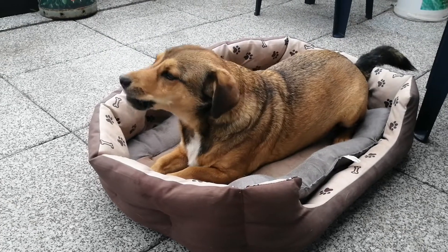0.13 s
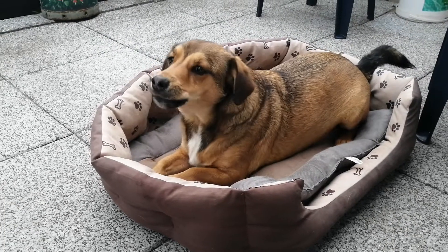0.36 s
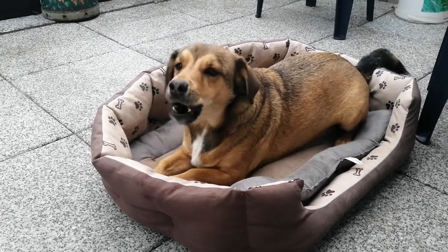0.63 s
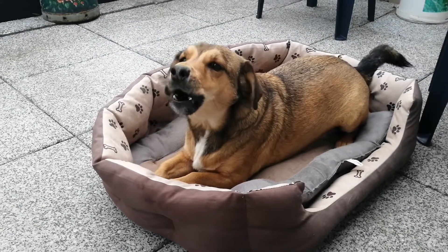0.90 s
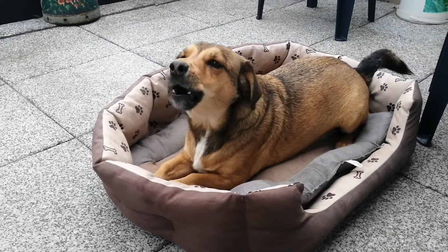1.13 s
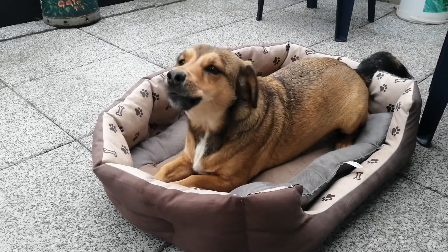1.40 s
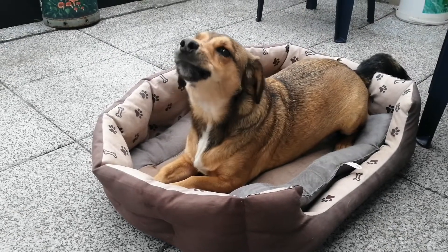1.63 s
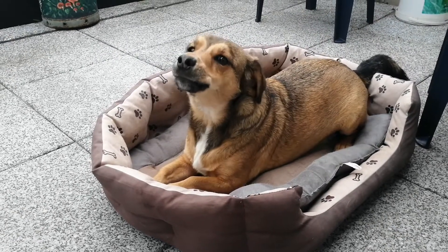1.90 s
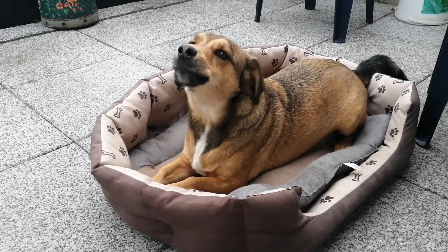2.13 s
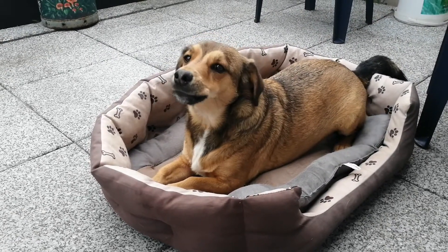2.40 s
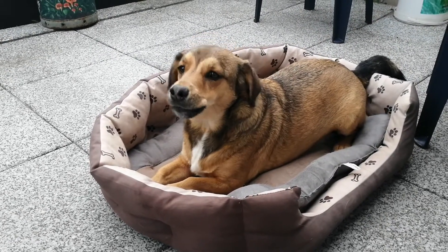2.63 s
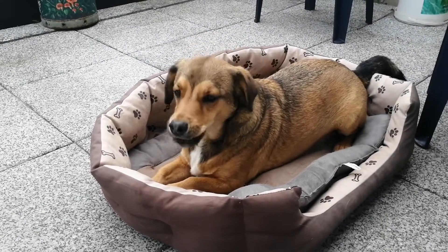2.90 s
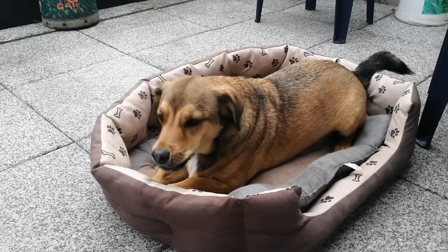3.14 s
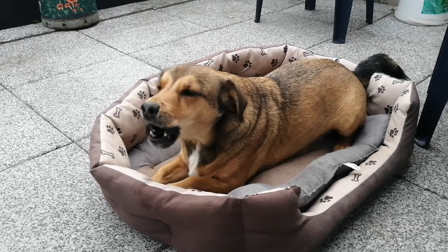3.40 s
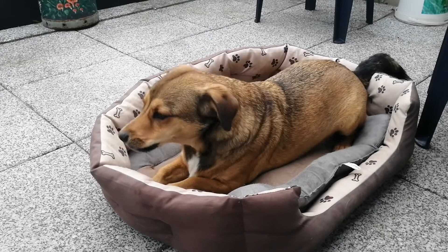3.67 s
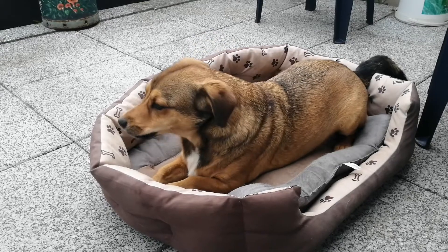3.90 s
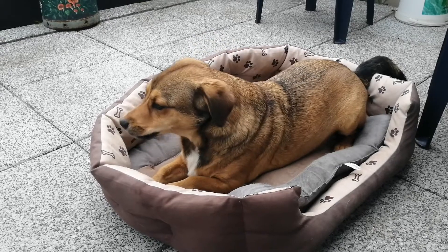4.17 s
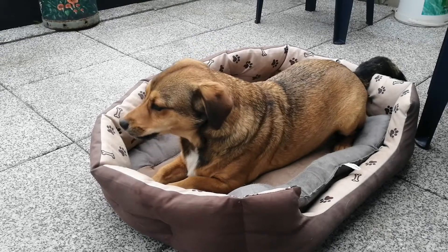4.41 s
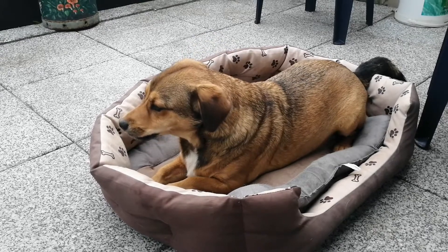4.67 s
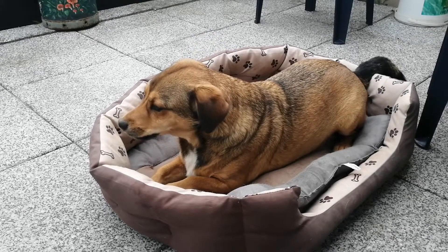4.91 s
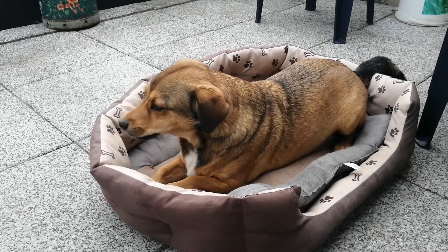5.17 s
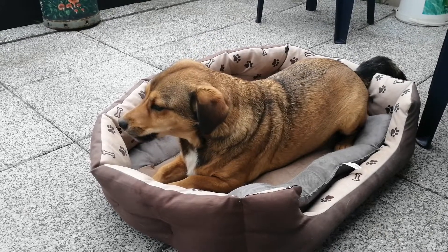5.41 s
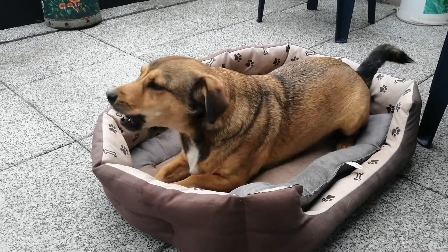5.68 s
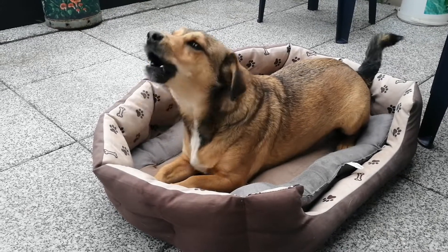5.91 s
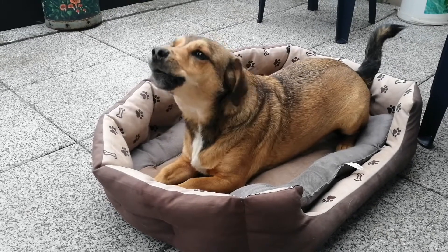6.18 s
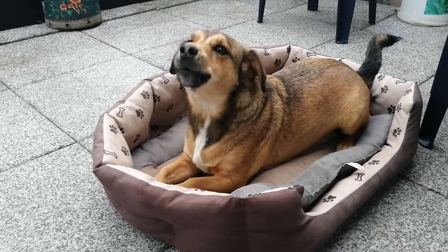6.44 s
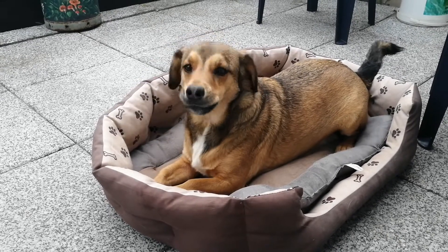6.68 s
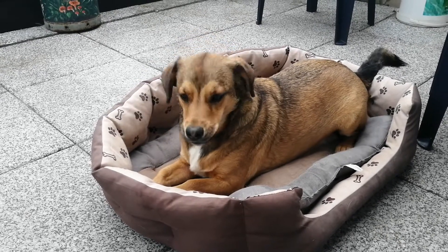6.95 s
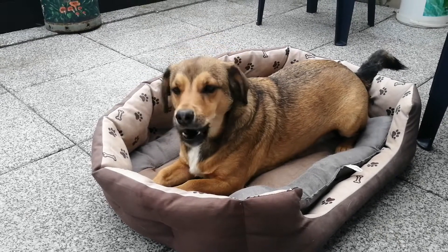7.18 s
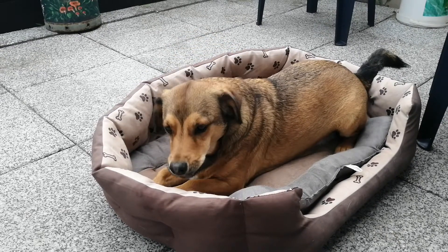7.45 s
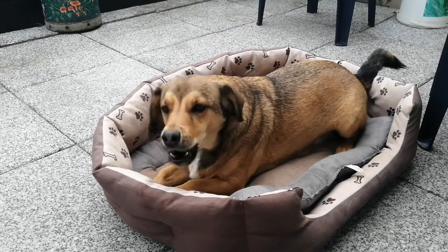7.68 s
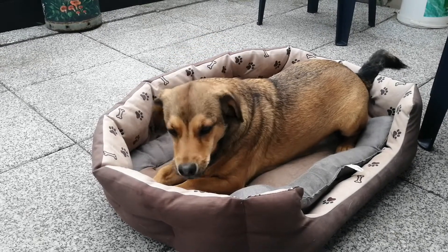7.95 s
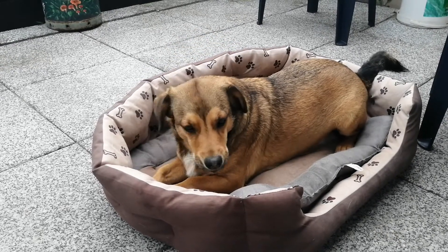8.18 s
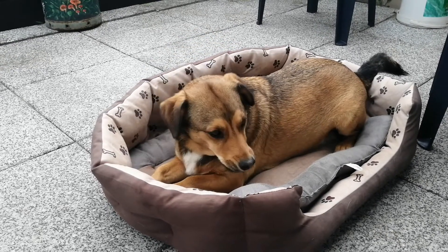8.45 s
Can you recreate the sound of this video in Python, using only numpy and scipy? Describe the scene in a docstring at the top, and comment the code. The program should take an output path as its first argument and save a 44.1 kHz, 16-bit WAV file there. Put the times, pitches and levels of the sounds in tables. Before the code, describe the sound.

A small dog close by barks, yips and howls in several excited bouts with low growls between, outdoors on a terrace with short wall echoes.

```python
"""A small dog on a tiled terrace

The dog growls, yips, howls and barks close to a phone with two microphone ports. Its voice is a stack of
partials plus buzz and noisy air. Barks lock near 600 Hz; over most of them a second vibration arches above and
slides down into a growl. House walls answer at once and far buildings a quarter second late, as fading noise
tails. Behind are a low rumble that sinks under loud calls, town hiss and whistling birds."""
import sys
import numpy as np
from scipy import signal
from scipy.fft import rfft, irfft, next_fast_len
from scipy.io import wavfile
from scipy.ndimage import uniform_filter1d, minimum_filter1d, map_coordinates

SR = 44100
rng = np.random.default_rng(int(sys.argv[2]) if len(sys.argv) > 2 else 0)


def bounce(signal):
    """Save signal as a 16-bit WAV file at the path given by the first command-line argument."""
    frames = np.transpose(np.atleast_2d(signal))
    limited = np.clip(frames, -1, 1)
    pcm = np.round(limited * 32767).astype(np.int16)
    wavfile.write(sys.argv[1], SR, pcm)


def gain_from_decibels(decibels):
    """Convert decibel values to linear amplitude factors."""
    exponent = np.asarray(decibels, float) / 20
    return 10 ** exponent


N = 377937  # length [samples]

# Barks: (time the voice locks [s], climb [s], hold [s], locked pitch [Hz], level [dB])
BARK_CALLS = [(0.659, .085, .115, 574.2, -13), (3.056, .11, .115, 600.7, -13),
              (3.433, .065, 0.14, 590.8, -14.5), (5.694, 0.034, .15, 607, -13), (6.0, .046, .15, 598, -17),
              (7.248, .115, .14, 615, -15), (7.691, .075, .115, 604, -12.5)]
# Yips: (time at the top [s], hold [s], pitch [Hz], level [dB], mouth opening [0-1])
YIP_CALLS = [(-.05, .055, 416, -16.5, 1), (0.301, .1, 519, -16, 0.88), (2.172, .035, 390, -24.5, .36),
             (2.64, 0.062, 424.2, -20.5, 0.49)]
# How the pitch of a yip moves; stage is climb -1..0, hold 0..1, release 1..2: (stage, share of pitch)
YIP_PITCH_CURVE = [(-1, .35), (-.7, .55), (-.45, .73), (-.25, .87), (0, 1.01), (.5, .995), (1, .955),
                   (1.4, .9), (2, .85)]
# Howls, one table for each stretch between jumps of register:
# (time [s], pitch [Hz], level [dB], mouth opening [0-1])
HOWL_STRETCHES = [
    [(.67, 916, -26.5, .6), (.702, 985, -25, .6), (.77, 850, -27, 0.6), (.834, 711.5, -28, .35),
     (.87, 800, -24, 0.5), (.9, 980, -10, .2), (.922, 1046, -8, .15), (.96, 1080, -9, .4),
     (1.01, 1056, -10.5, 0.3)],
    [(1.005, 872, -20, .55), (1.035, 734.8, -17.5, .55), (1.063, 669.7, -22.5, 0.5),
     (1.12, 616.7, -23, 0.3), (1.16, 648.5, -24.5, 0.4), (1.225, 787.3, -13.5, .55),
     (1.251, 903, -9.5, .55), (1.319, 717.3, -15.5, .5), (1.35, 592.4, -15.5, 0.4)],
    [(1.352, 503.8, -18, .3), (1.396, 483, -18.5, .28), (1.47, 432.5, -23.5, .25), (1.55, 400, -30, 0.4),
     (1.6, 374.7, -31.5, .22), (1.68, 354.2, -32, .15), (1.72, 348, -36.5, 0.1), (1.77, 339.7, -51.5, .1)],
    [(6.03, 927, -28.5, 0.4), (6.1, 980, -23.5, 0.8), (6.15, 746, -25.5, 0.6), (6.208, 496.8, -28.5, .4),
     (6.286, 434, -28, 0.4), (6.348, 448.4, -19.5, 0.2), (6.372, 503, -16.5, 0.3)],
    [(6.372, 670, -19, 0.2), (6.39, 709.6, -18, 0.7), (6.442, 952, -12.5, 1), (6.47, 743.8, -23, .6),
     (6.524, 466.5, -20, .35), (6.56, 442.7, -34, .3)],
    [(6.56, 315, -35, 0.7), (6.63, 235, -50, .05), (6.76, 245, -71, .03)],
]
# Growls that die away after a call and swell before the next:
# (start [s], end [s], start pitch [Hz], level dying from the start [dB], level swelling to the end [dB])
GROWL_CALLS = [(.03, 0.252, 200, -40, -28.5), (0.398, 0.603, 165, -31.5, -25.5),
               (1.689, 2.095, 245, -28, -30.5), (2.2, 2.531, 250, -32, -43), (2.704, 2.964, 233, -33, -30),
               (3.25, 3.375, 226.8, -50.5, -42.5), (5.655, 5.692, 168.9, -31.5, -45.5),
               (5.88, 5.968, 215, -49.5, -42.5), (7.122, 7.2, 135, -37, -33.5),
               (7.565, 7.63, 200, -59.5, -36)]


def unit(x):
    """Scaled to rms 1."""
    return x / np.sqrt(np.mean(x ** 2) + 1e-20)


def steady(x, window_s):
    """x with its slow level divided out."""
    power = np.abs(uniform_filter1d(x ** 2, int(window_s * SR)))
    return x / np.sqrt(power + 1e-4 * np.mean(x ** 2))


def along(hz_points, values, hz):
    """Values joined on a log-frequency axis."""
    return np.interp(np.log(hz + 1), np.log(np.asarray(hz_points) + 1), values)


def filtered(x, response):
    """x times a complex response of frequency."""
    m = next_fast_len(x.shape[-1] + 8192)
    spectrum = rfft(x, m) * response(np.fft.rfftfreq(m, 1 / SR))
    return irfft(spectrum, m)[..., :x.shape[-1]]


def coloured(x, spectrum):
    """x through a curve of (frequency [Hz], level [dB]) points."""
    return filtered(x, lambda hz: gain_from_decibels(along(*np.transpose(spectrum), hz)))


def flutter(count, rate):
    """Smooth complex chance of rms 1 (its real part has rms 0.7), rate knots a second."""
    knots = rng.standard_normal((2, int(count * rate / SR) + 4))
    at = [np.arange(count) * rate / SR]
    real, imaginary = [unit(map_coordinates(row, at)) / np.sqrt(2) for row in knots]
    return real + 1j * imaginary


def dog():
    """All calls, with overtones and turbulent air released by the open jaw."""
    # Sound leaving the mouth in the middle range: (frequency [Hz], relative level [dB])
    mouth_curve = [(1300, -56.5), (1750, -3.5), (2000, -5), (2250, -4), (2700, -6.5), (3100, -13.5),
                   (3350, -26.5), (4200, -120)]
    # Treble through the open muzzle: (frequency [Hz], relative level [dB])
    open_curve = [(3000, -37.5), (3400, -15), (3750, -17), (4200, -0.5), (4900, -3.5), (5500, -5.5),
                  (6800, -3.5), (7600, 1.5), (8800, -5), (10000, -10.5), (11500, -22), (13000, -31),
                  (15200, -35)]
    # Treble through rounded lips: (frequency [Hz], relative level [dB])
    rounded_curve = [(3000, -41), (3500, -24.5), (4600, -23.5), (5600, -1), (6400, -9.5), (7000, -22.5),
                     (7800, -9.5), (9500, -12.5), (11000, -34), (15200, -52)]
    rough = roughness(np.arange(N) / SR)
    notes = barks() + yips() + HOWL_STRETCHES + growls()
    low, buzz, mouth, muzzle, jaw = folds(notes, rough, spread_hz=450, jitter=0.027)
    # air bursts out in ragged puffs
    air = rng.standard_normal(N) * gain_from_decibels(4 * flutter(count=N, rate=110).real)

    def band(spectrum, breathy, airy):
        """Buzz and air through one shape of the mouth; rough folds let more air through."""
        share = np.clip(breathy + airy * rough, 0, .97)
        voiced = steady(coloured(buzz, spectrum), 0.028)
        return np.sqrt(1 - share) * voiced + np.sqrt(share) * unit(coloured(air, spectrum))

    # the treble comes through rounded lips until the muzzle opens
    opening = np.clip((jaw - .33) / .3, 0, 1)
    treble = opening * band(open_curve, .1, 2.2) + (1 - opening) * band(rounded_curve, .15, 3)
    overtones = mouth * band(mouth_curve, 0.04, 1.59) + muzzle * treble
    # rough folds close in uneven bursts
    creak = gain_from_decibels(5 * rough * flutter(count=N, rate=130).real)
    return creak * low + shifting(overtones, depth_db=7.0)


def barks():
    """Each bark climbs and locks; the second vibration arches over it unless a howl carries it on."""
    # One bark; stage is climb -1..0, then in holds from 0:
    # (stage, share of pitch, level added [dB], mouth opening [0-1])
    bark_curve = [(-1, 0.35, -31.5, .05), (-.8, .55, -21.5, .25), (-.6, .73, -8, 0.6), (-.35, .82, -4, 0.8),
                  (0, .98, 0.5, .98), (.3, 1.02, 1.64, 0.97), (.65, 1.02, -8, 1), (1, .97, -20, 0.7),
                  (1.2, .95, -35.5, 0.6)]
    # The second vibration: (time from its top [s], pitch [Hz], level re bark [dB], mouth opening [0-1])
    arch_curve = [(-.05, 850, -11.5, .9), (0, 995, -7.5, 0.82), (.055, 769.2, -16.5, .85),
                  (.1, 519.7, -27.5, .3), (.14, 321.2, -43, .15), (.19, 185, -50.5, .03)]
    arch_top = .42  # where the arch peaks, as a share of the hold
    notes = []
    stage, share, shape_db, opening = np.transpose(bark_curve)
    for s, climb, hold, hz, db in BARK_CALLS:
        times = s + stage * np.where(stage < 0, climb, hold)
        notes.append(np.transpose([times, hz * share, db + shape_db, opening]))
        if not any(abs(howl[0][0] - s) < .05 for howl in HOWL_STRETCHES):
            notes.append(np.add(arch_curve, [s + arch_top * hold, 0, db, 0]))
    return notes


def yip_times(s, hold, hz, stage):
    """Stages of a yip in seconds; the length of the climb grows with the pitch range it covers."""
    climb_hz_per_s, release_s = 2500, .07
    climb = hz * (1 - YIP_PITCH_CURVE[0][1]) / climb_hz_per_s
    return np.interp(stage, np.arange(-1, 3), [s - climb, s, s + hold, s + hold + release_s])


def yips():
    """Clear short notes out of a growl."""
    # At the stages of the pitch curve: (level added [dB], share of mouth opening)
    yip_curve = [(-38.5, .05), (-18, .12), (-10, .3), (-2.5, .9), (-1.6, 1), (-1.55, 1), (-3.5, 1),
                 (-16, .7), (-32, .2)]
    stage, share = np.transpose(YIP_PITCH_CURVE)
    shape_db, wide = np.transpose(yip_curve)
    notes = []
    for s, hold, hz, db, opening in YIP_CALLS:
        times = yip_times(s, hold, hz, stage)
        notes.append(np.transpose([times, hz * share, db + shape_db, opening * wide]))
    return notes


def growls():
    """Through nearly closed lips, pitch settles to the chest note as a dying and a swelling effort overlap."""
    chest_hz, settle_s = 115, 0.074
    die_db_per_s, swell_db_per_s, opening = 147, 190.5, 0.013
    notes = []
    for start, end, hz, start_db, end_db in GROWL_CALLS:
        s = np.linspace(start, end, 16)
        dying = gain_from_decibels(start_db - die_db_per_s * (s - start))
        swelling = gain_from_decibels(end_db - swell_db_per_s * (end - s))
        pitch = chest_hz + (hz - chest_hz) * np.exp((start - s) / settle_s)
        notes.append(np.transpose([s, pitch, 20 * np.log10(dying + swelling), opening + 0 * s]))
    return notes


def roughness(t):
    """Irregular vibration 0-1: where two vibrations fight, growls, yips crack and register breaks."""
    # Breaks of register: (start [s], end [s], roughness [0-1])
    break_spans = [(.33, .34, .06), (1.02, 1.05, .4), (1.3, 1.355, .15), (1.57, 1.75, .5),
                   (2.96, 2.985, .3), (5.65, 5.7, .65), (6.39, 6.58, .2), (7.11, 7.19, .45)]
    clear, growled, barked, climbing, cracked = .012, .09, .5, .1, .5
    ramp_s = .02
    spans = break_spans + [(start, end, growled) for start, end, *_ in GROWL_CALLS]
    for s, climb, hold, *_ in BARK_CALLS:
        spans += [(s - climb, s, climbing), (s + ramp_s / 2, s + hold, barked),
                  (s + hold, s + 2 * hold, climbing)]
    for s, hold, hz, *_ in YIP_CALLS:
        # yips crack on the way in and on the way out
        for pair in ([-.8, -.35], [1.2, 1.9]):
            spans.append((*yip_times(s, hold, hz, pair), cracked))
    curves = [np.interp(t, [a - ramp_s, a, b, b + ramp_s], [clear, r, r, clear]) for a, b, r in spans]
    return np.max(curves, 0)


def folds(notes, rough, spread_hz, jitter):
    """Low partials, upper buzz and the jaw's levels; rough folds smear each partial into a band."""
    # Vocal tract over the low partials:
    # (frequency [Hz], level with lips shut [dB], rounded [dB], half open [dB], wide open [dB])
    tract = [(100, -3.5, -8.5, -12, -14), (240, 2.9, -7.5, -10, -13.5), (400, -14.5, -2.8, -1.2, -2),
             (600, -11.5, 0.1, -2.5, -1.9), (800, -9.5, -4, -10, -3.5), (950, -20, 3, -0.5, 2.5),
             (1250, -50, -18, -13.5, 4), (1500, -60.5, -25, -.5, -20.5), (1700, -67.5, -24, -9, -5),
             (1900, -70.5, -29, -28.5, -2), (2300, -78, -34, -35, -28), (2800, -81.5, -64.5, -59.5, -55)]
    # The mouth openings [0-1] of those four shapes
    shape_openings = [0, .22, .55, 1]
    source_db_per_octave = -1.5
    wander_db = 2.4  # each partial swells and fades as the tongue moves
    mouth_db, muzzle_db = -14.5, -23  # overtones re the voice with the jaw open
    mouth_shut_db, muzzle_shut_db = -23, -14.5  # added when the jaw is shut
    low, buzz, mouth, muzzle, jaw = np.zeros((5, N))
    tract_hz, *shapes_db = np.transpose(tract)
    for note in notes:
        s, *cols = np.transpose(note)
        # notes that touch overlap briefly
        at = np.arange(max(round((s[0] - .003) * SR), 0), round((s[-1] + .003) * SR))
        pitch, db, opening = [np.interp(at / SR, s, c) for c in cols]
        # the folds change tension smoothly
        pitch = uniform_filter1d(pitch, int(.025 * SR), mode="nearest")
        opening = np.clip(opening, 0, 1)
        # 6 ms fades; a note at the very start is already sounding
        from_start = at - at[0] + (s[0] < .01) * SR
        fade = np.sin(np.pi / 2 * np.clip(np.minimum(from_start, at[-1] - at) / (.006 * SR), 0, 1)) ** 2
        phase, share = 2 * np.pi * np.cumsum(pitch) / SR, rough[at]

        order = np.arange(1, 11)[:, None]
        blend = [np.interp(opening, shape_openings, one) for one in np.eye(len(shape_openings))]
        tract_db = sum(w * along(tract_hz, shape_db, order * pitch) for w, shape_db in zip(blend, shapes_db))
        gains = gain_from_decibels(tract_db + source_db_per_octave * np.log2(order))
        gains *= fade * gain_from_decibels(db) / np.sqrt((gains ** 2).sum(0))
        for k, gain in enumerate(gains, start=1):
            # the throat resonance holds a high fundamental steadier than its overtones
            smear = share * np.where((k == 1) & (pitch > 420), .35, .75)
            # the smear widens with the partial's number; spread_hz is that of the second
            chance = flutter(count=len(at), rate=spread_hz * (1 + k) / 3)
            shake = np.sqrt(1 - smear) + np.sqrt(smear) * chance
            wander = gain_from_decibels(wander_db * flutter(count=len(at), rate=28).real)
            low[at] += np.sqrt(2) * gain * wander * np.imag(shake * np.exp(1j * k * phase))

        # cycles come slightly early or late, which blurs the highest partials most
        upper = np.arange(2, 40)[:, None]
        uneven = phase + jitter * (1 + 4 * share) * flutter(count=len(at), rate=150).real
        lines = np.sin(upper * uneven + rng.uniform(0, 2 * np.pi, upper.shape)) * (upper * pitch < 14000)
        buzz[at] += fade * gain_from_decibels(db) * np.sqrt(pitch) * lines.sum(0)
        mouth[at] += (fade * gain_from_decibels(db + mouth_db + mouth_shut_db * (1 - opening))) ** 2
        bright = (fade * gain_from_decibels(db + muzzle_db + muzzle_shut_db * (1 - opening))) ** 2
        muzzle[at] += bright
        jaw[at] += bright * opening
    # powers become levels; the jaw is the opening averaged over the notes that sound
    return low, buzz, np.sqrt(mouth), np.sqrt(muzzle), jaw / (muzzle + 1e-20)


def shifting(x, depth_db):
    """Tongue and lips keep moving: patches of frequency swell and fade."""
    z = signal.stft(x, nperseg=512)[2]
    field = uniform_filter1d(rng.standard_normal(z.shape), size=7, axis=0)
    field = uniform_filter1d(field, size=10, axis=1)
    return signal.istft(z * gain_from_decibels(depth_db * unit(field)), nperseg=512)[1][:N]


def breath():
    """A short intake of air before a bout: noise through throat resonances."""
    # The dog draws breath: (start [s], length [s], level [dB])
    intakes = [(5.531, .11, -57.5)]
    # Throat resonances: (frequency [Hz], width [Hz], relative level [dB])
    resonances = [(850, 78, 4), (2400, 200, -8), (3650, 200, -18)]
    swell = np.zeros(N)
    for s, length, db in intakes:
        count = round(length * SR)
        swell[round(s * SR):][:count] = gain_from_decibels(db) * np.hanning(count) ** .5

    def tube(f):
        """All the resonances side by side."""
        return sum(gain_from_decibels(db) * 1j * f * w / (c * c - f * f + 1j * f * w) for c, w, db in resonances)

    return swell * unit(filtered(rng.standard_normal(N), tube))


def ports(x):
    """The phone body delays and shades the direct sound differently at each port."""
    # The two ports:
    # (frequency [Hz], phase by which left leads [rad], left minus right [dB], shared colour [dB])
    port_curve = [(54.6, -2.5, -3, -4.5), (656.5, 1, 1.5, 4), (803, -0.15, 1.5, 1.5), (1221, 1.9049, -3, 2),
                  (1480, 2, -11.5, 7.5), (1993, 2.5, 4, 3), (2860, 0.91, -1, -1), (3400, 1.5, -3.5, 6),
                  (4100, 1.5, -9, 1.5), (5485, 4.5, -4, 3), (6500, 5, -3.5, -2), (8470, 6.5, -6, -9.5),
                  (11295, 10.5, 6, 0.5), (13090, 14, 6.5, 0)]
    hz_points, lead, balance_db, colour_db = np.transpose(port_curve)
    side = np.array([[.5], [-.5]])

    def response(f):
        """Half of each difference goes to either side."""
        level_db = along(hz_points, colour_db, f) + side * along(hz_points, balance_db, f)
        return gain_from_decibels(level_db) * np.exp(1j * side * along(hz_points, lead, f))

    return filtered(x, response)


def answer(x, decays, delay_s, rise_s):
    """A diffuse stereo tail of noise, each frequency dying at its own speed."""
    hz, t, z = signal.stft(rng.standard_normal((2, SR)), SR, nperseg=256)
    t60 = along(*np.transpose(decays), hz)[:, None]
    shape = gain_from_decibels(-60 * t / t60) * (1 - np.exp(-t / rise_s))
    tail = signal.istft(z * shape, SR, nperseg=256)[1]
    tail = tail / np.sqrt(np.mean(tail ** 2) * 2 * SR / 100)
    late = np.pad(x, (round(delay_s * SR), 0))[None]
    return signal.fftconvolve(late, tail, axes=1)[:, :N] / 10


def chirps():
    """Far birds: husky gliding whistles, blurred by distance."""
    # (start [s], length [s], start pitch [Hz], end pitch [Hz], level [dB])
    whistles = [(1.828, 0.11, 3770, 3480, -64.5), (1.946, 0.043, 3500, 3270, -66),
                (2.004, 0.078, 2900, 2750, -60), (2.408, 0.067, 2540, 2560, -69.5),
                (4.27, .05, 3600, 3510, -75), (4.864, .05, 4100, 3900, -66.5),
                (4.902, .06, 3096, 3370, -71), (4.901, 0.18, 1700, 1660, -66.5),
                (5.24, .07, 3650, 3700, -74), (6.857, .06, 4100, 4340, -65),
                (6.887, 0.044, 3110, 3550, -66)]
    out = np.zeros(N)
    for s, length, from_hz, to_hz, db in whistles:
        glide = np.linspace(from_hz, to_hz, round(length * SR))
        tone = flutter(count=len(glide), rate=390) * np.exp(2j * np.pi * np.cumsum(glide) / SR)
        out[round(s * SR):][:len(glide)] += gain_from_decibels(db) * np.hanning(len(glide)) * tone.real
    return out


def outdoors():
    """A low rumble whose level dips at times, over an even town hiss, both shaped noise."""
    # Level of the low rumble, which sinks under loud calls: (time [s], rumble level [dB])
    rumble_levels = [(0.0, -67), (1.12, -78), (1.67, -62), (2.98, -60), (3.13, -78), (4.01, -55),
                     (4.94, -65.5), (5.06, -59), (5.34, -65.5), (5.75, -54), (5.85, -83.5), (7.14, -58),
                     (7.35, -74), (8.57, -64)]
    # Colour of the rumble: (frequency [Hz], relative level [dB])
    rumble_curve = [(12, -35), (20, 0), (54, 0), (113, -11), (146, -17.5), (200, -22.5), (260, -53),
                    (440, -120)]
    # Colour of the town hiss: (frequency [Hz], relative level [dB])
    town_curve = [(80, -29.5), (130, -8), (250, -12.5), (500, -18), (1000, -19.5), (2000, -22.5),
                  (3200, -28), (5000, -34), (8000, -34), (11000, -46), (15200, -48)]
    rumble_db = np.interp(np.arange(N) / SR, *np.transpose(rumble_levels))
    rumble = gain_from_decibels(rumble_db + 3.4 * flutter(count=N, rate=36).real)
    town = gain_from_decibels(-67.5 + 1.2 * flutter(count=N, rate=2.0).real)
    return rumble * rush(rumble_curve) + town * rush(town_curve)


def rush(spectrum):
    """Stereo noise of rms 1, most alike on both ports in the bass."""
    # (frequency [Hz], left-right likeness [0-1])
    likeness = [(60, 0.18), (150, 0.66), (390, 0.19), (1010, 0.01), (2600, 0.05)]
    pair = coloured(rng.standard_normal((2, N)), spectrum)

    def mix(hz):
        """Shares of the common and the opposite part that give this likeness."""
        turn = np.arccos(np.clip(along(*np.transpose(likeness), hz), 0, 1)) / 2
        return np.array([np.cos(turn), np.sin(turn)])

    mid, side = filtered(pair, mix)
    return unit(np.array([mid + side, mid - side]))


def limited(x, ceiling, hold_s):
    """Gain that ducks just ahead of each peak and recovers smoothly."""
    width = int(hold_s * SR)
    need = np.minimum(ceiling / (np.abs(x).max(0) + 1e-9), 1)
    return x * uniform_filter1d(minimum_filter1d(need, 2 * width), width)


def scene():
    """Dog, its echoes, birds and the open air."""
    # How long echoes take to fall by 60 dB, for house walls, terrace tiles and far buildings:
    # (frequency [Hz], decay time [s])
    wall_decay = [(200, 0.51), (900, 0.37), (1700, 0.38), (8000, 0.32)]
    tile_decay = [(200, .04), (2000, 0.019), (10000, 0.014)]
    street_decay = [(300, 0.96), (1000, 0.68), (3000, 0.35), (5000, 0.21)]
    voice, birds = dog() + breath(), chirps()
    walls = gain_from_decibels(-11) * answer(voice, wall_decay, delay_s=.012, rise_s=0.00263)
    tiles = gain_from_decibels(-6.5) * answer(voice, tile_decay, delay_s=0.0016, rise_s=0.00061)
    distant = coloured(voice, [(300, -20.0), (600, 8.0), (900, -5.5), (2000, 1), (4000, -21.0)])
    far = gain_from_decibels(-36.0) * answer(distant, street_decay, delay_s=0.24, rise_s=0.0083)
    bird_echo = gain_from_decibels(2.5) * answer(birds, wall_decay, delay_s=.01, rise_s=.01)
    return ports(voice) + walls + tiles + far + birds + bird_echo + outdoors()


def low_pass(x):
    """Removes everything above the highest recorded frequency."""
    return signal.sosfilt(signal.butter(12, 15140, fs=SR, output="sos"), x)


def record(dry):
    """The phone's limiter holds down the peaks."""
    safe = limited(dry, ceiling=.96, hold_s=.012)
    return low_pass(safe)


dry = scene()
out = record(dry)
bounce(out)
```